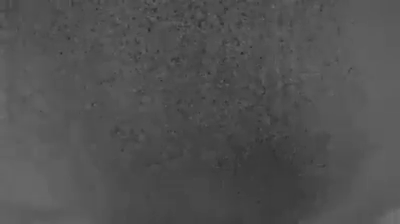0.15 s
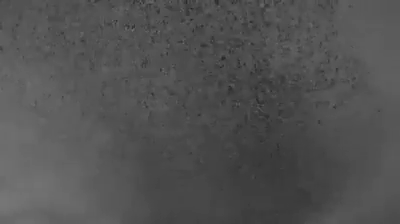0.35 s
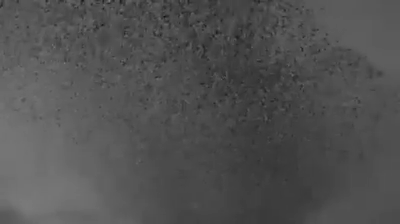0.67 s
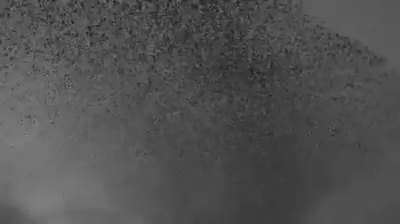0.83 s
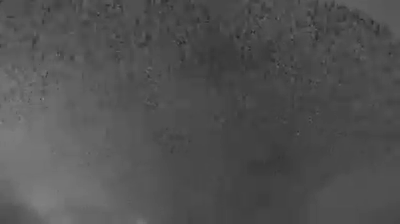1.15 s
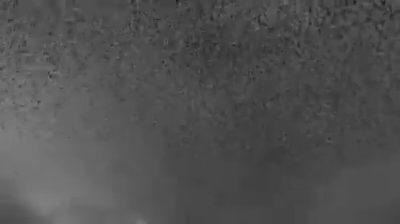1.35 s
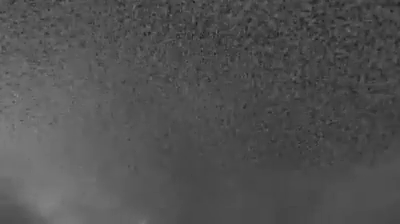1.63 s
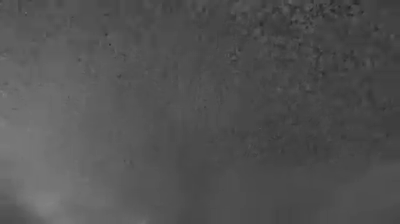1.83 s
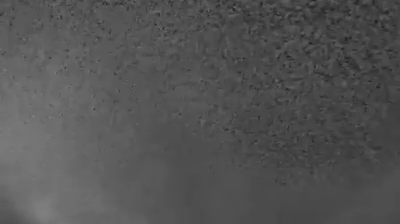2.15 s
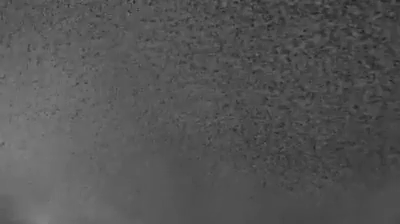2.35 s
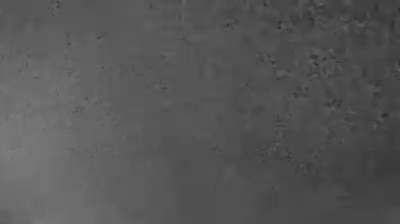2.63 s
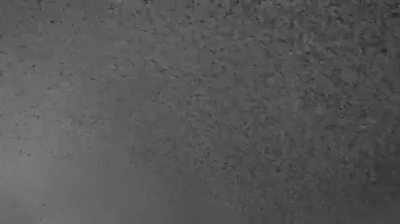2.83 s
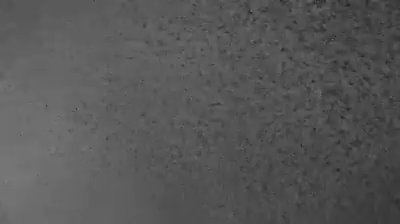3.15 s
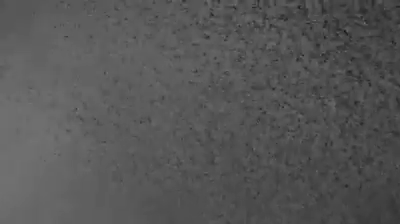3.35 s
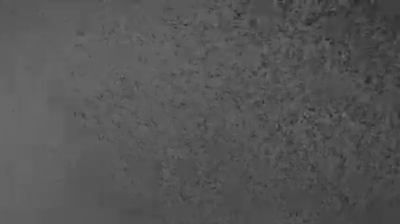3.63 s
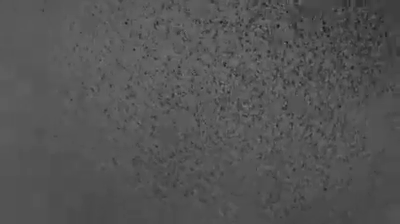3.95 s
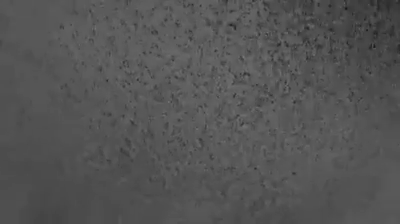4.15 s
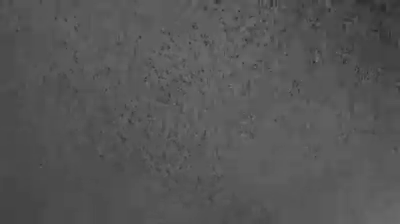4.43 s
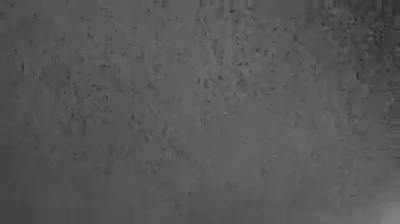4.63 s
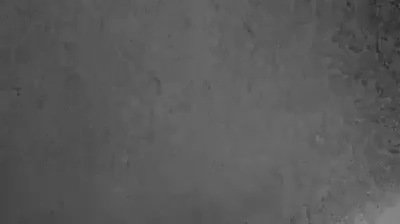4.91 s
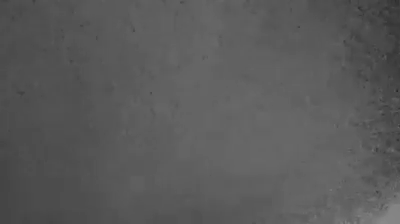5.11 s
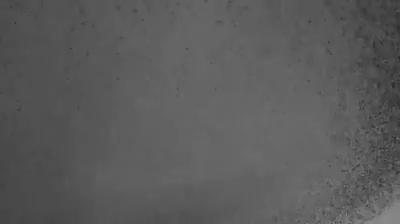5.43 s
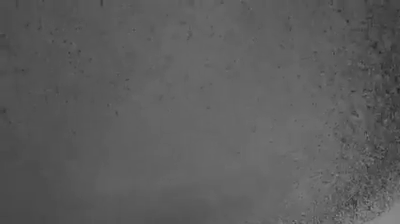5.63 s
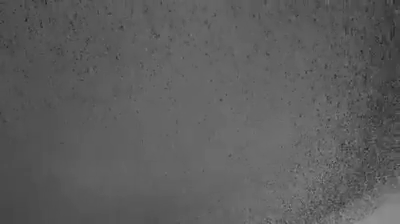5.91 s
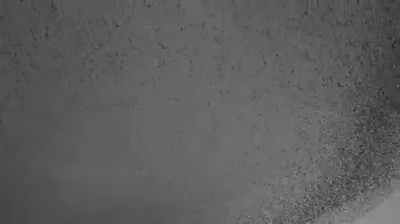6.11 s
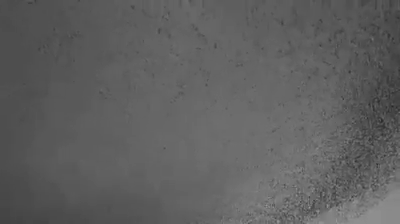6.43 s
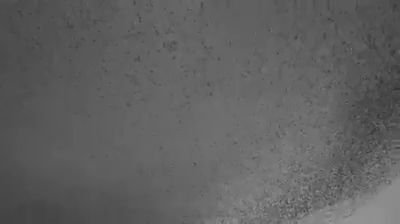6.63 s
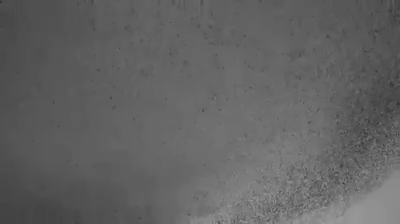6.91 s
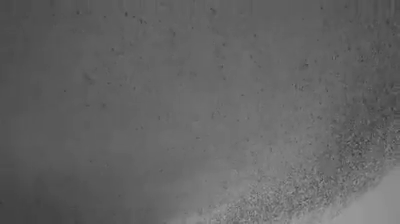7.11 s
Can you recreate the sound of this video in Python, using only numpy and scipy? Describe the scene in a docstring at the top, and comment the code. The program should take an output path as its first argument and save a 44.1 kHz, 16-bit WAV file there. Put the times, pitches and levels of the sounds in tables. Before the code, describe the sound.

From 0 seconds an enormous flock of small birds is already streaming past, close and low over open fields. Its wings merge into one loud, continuous rush: a mid-low thrum of pushed air, a broad feathery swish and a weak fine hiss, trembling with quick flutter and slight surges, with little deep bass. Short, raspy, buzzing chirps stand out from the start, a brighter pair around 0.5, others scattered through 1 to 3, and a clearer, lower whistle near 3.0. Behind them a faint, blurred chatter comes and goes. At about 4.1 a sharp, high call starts with a dry tick; more clipped calls cluster near 4.8, 5.6, 6.4 and 6.7, some ticking. From about 5 the rush weakens slightly as the flock draws off. A low, short chirp comes near 7.0, and the wings still rush at the end, around 7.3. Mono, with softened treble.

```python
"""A huge flock of small birds streams low over open fields, heard through one small microphone.
From the start the wings are one long rush of shaped noise: a thrum of pushed air, a swish and a fine hiss.
Short raspy chirps, made of gliding whistles, stick out of it over a far chatter that comes and goes.
After about four seconds a few sharp calls start abruptly, each with a short tick of noise.
Towards the end the flock draws off, and thrum, swish, hiss and chatter grow weaker."""
import sys
import numpy as np
from scipy import signal
from scipy.fft import rfft, irfft
from scipy.io import wavfile

SR = 44100
rng = np.random.default_rng(int(sys.argv[2]) if len(sys.argv) > 2 else 0)


def wav_record(signal):
    """Record a signal, one row per channel, as 16-bit PCM in the file named by sys.argv[1]."""
    frames = np.transpose(np.atleast_2d(signal))
    bounded = np.clip(frames, -1, 1)
    # unit amplitude maps onto the largest positive 16-bit level
    quanta = np.round(bounded * 32767).astype(np.int16)
    wavfile.write(sys.argv[1], SR, quanta)


N = 320166
T = np.arange(N) / SR   # time of every sample, s
HZ = np.maximum(np.arange(N // 2 + 1) * SR / N, 1)   # every frequency of the spectrum, Hz

# how strong the wings are as the flock streams overhead and draws off, before small changes:
# t/s, thrum of pushed air/dB, feather swish/dB
FLOCK_LEVELS = [(0, -17, -17.5), (0.2, -20, -18), (0.8, -20, -17.5), (1.1, -17.5, -17.5), (1.6, -20, -17.5),
                (1.95, -18, -17.5), (2.2, -19.5, -17.5), (3.6, -21, -18), (4.15, -20, -18),
                (4.6, -22.5, -18), (4.9, -20.5, -18.5), (5.45, -23, -19.0), (5.85, -21, -19.5),
                (6.5, -22.5, -19.5), (7.08, -23.5, -19.5), (7.26, -24, -19)]


def from_db(db):
    """Turn decibels into a gain."""
    return 10 ** (np.asarray(db) / 20)


def rms_one(x):
    """Scale to an average strength (rms) of 1."""
    return x / np.sqrt(np.mean(x ** 2) + 1e-20)


def in_time(rows):
    """Draw straight lines between the rows, giving each column a value at every sample."""
    s, *columns = np.transpose(rows)
    return [np.interp(T, s, column) for column in columns]


def below(edge_hz, order=4):
    """Gain at every frequency of a filter that keeps what is below the edge."""
    return 1 / np.sqrt(1 + (HZ / edge_hz) ** (2 * order))


def above(edge_hz, order=4):
    """Gain at every frequency of a filter that keeps what is above the edge."""
    return 1 / np.sqrt(1 + (edge_hz / HZ) ** (2 * order))


def coloured(x, gain):
    """Give each frequency its own gain, then scale to rms 1."""
    return rms_one(irfft(rfft(x) * gain, N))


def wobble(rate_hz):
    """A smooth random curve around 0 with spread 1; a higher rate makes it quicker."""
    return coloured(rng.standard_normal(N), below(rate_hz, order=2))


def wing_strokes(pass_s, sharpness, count=70):
    """Power from the nearest birds: each swells and fades as it passes, pulsing on every downstroke; mean 1."""
    wingbeats_per_s = 12   # each bird beats at 0.75 to 1.25 times this
    t = T[::40]   # slow curves need fewer points
    when, pace, phase, size = rng.random((count, 4)).T[:, :, None]
    # spread the passing birds evenly, with some chance
    when = (np.arange(count)[:, None] + when) / count * (T[-1] + 1) - .5
    beats = wingbeats_per_s * (.75 + .5 * pace) * t + phase
    downstroke = (np.sin(np.pi * beats) ** 2) ** abs(sharpness)
    nearness = 1 / (1 + ((t - when) / pass_s) ** 2) ** 2
    power = np.sum((.5 + size) * downstroke * nearness, axis=0)
    return np.interp(T, t, power / power.mean())


def turbulence(strokes, near_share):
    """Air torn by wings is noise: the near wings pulse, the far ones blend into an even noise."""
    share = np.clip(near_share, 0, 1)
    return rng.standard_normal(N) * np.sqrt(1 - share + share * strokes)


def fluttering(x, flutter_db=1.0, flutter_rate_hz=26, count=14):
    """Small knots of wings flutter in and out of step, each knot in its own band of the rush."""
    centres = np.linspace(np.log(300), np.log(3500), count)
    spectrum, out = rfft(x), np.zeros(N)
    for weights in np.eye(count):
        band_gain = np.interp(np.log(HZ), centres, weights)
        band = irfft(spectrum * band_gain, N)
        out += band * rms_one(from_db(flutter_db * wobble(flutter_rate_hz)))
    return irfft(rfft(out) * above(130), N)   # keep the quick flutter from spilling into the deep bass


def wings(thrum_edge_hz=900, hiss_edge_hz=7500, swish_db=0.5):
    """Wings push air on the downstroke, swish through the flight feathers and hiss at their tips."""
    # colour of the rush, before it is split into thrum, swish and hiss: f/Hz, level per Hz/dB
    rush_colour = [(120, -67), (160, -48), (200, -29), (250, -12.5), (330, -2), (510, 2), (780, -0.5),
                   (1020, -0.67), (1600, -4.5), (2700, -5.5), (3600, -10), (4600, -15), (5800, -17),
                   (7200, -21.5), (8500, -22.5), (11500, -34.5)]
    hz, db = np.transpose(rush_colour)
    colour = from_db(np.interp(np.log(HZ), np.log(hz), db)) * above(92)

    thrum_level, swish_level = in_time(FLOCK_LEVELS)
    # knots of birds beat together, so the thrum surges a little at random
    surge_db, surge_rate_hz = .4, 2.8
    thrum_level = thrum_level + surge_db * wobble(surge_rate_hz)
    # the air swallows the hiss, so it changes by several dB for each dB of swish
    hiss_db, hiss_db_per_swish_db = -35, 3   # the first is the level at the mean swish
    hiss_level = hiss_db + hiss_db_per_swish_db * (swish_level - swish_level.mean())

    pushes = wing_strokes(pass_s=0.23, sharpness=9.1)
    flicks = wing_strokes(pass_s=0.079, sharpness=6.6, count=130)
    swish_colour = colour * above(thrum_edge_hz) * below(hiss_edge_hz)
    thrum = coloured(turbulence(pushes, near_share=0.11), colour * below(thrum_edge_hz))
    swish = coloured(turbulence(flicks, near_share=0.054), swish_colour)
    rush = from_db(thrum_level) * thrum + from_db(swish_level + swish_db) * swish
    fluttered = fluttering(rush)
    hiss = coloured(turbulence(flicks, near_share=0.12), colour * above(hiss_edge_hz))
    return fluttered + from_db(hiss_level) * hiss


def rumble(level_db=-94):
    """A trace of low, steady noise."""
    return from_db(level_db) * wobble(130)


def chirps(rows, buzz_hz, buzz_depth, jitter_hz=800):
    """Each call is a gliding whistle, its pitch shaken into a rasp and its loudness chopped into a buzz."""
    attack_s, release_s = .006, .016   # a firm start and a softer end
    clear_rasp_hz = 110   # a call with a narrower rasp than this is a clear whistle and hardly buzzes
    out, buzz_drift = np.zeros(N), wobble(45)
    # the pitch swings between limits, so each call has a firm top edge
    shake = rms_one(np.tanh(2 * wobble(jitter_hz)))
    for s, length, start_hz, end_hz, rasp_hz, db in rows:
        at = np.arange(max(int(s * SR), 0), min(int((s + length) * SR), N))
        age = np.clip(T[at] - s, 0, length)
        buzz_rate = buzz_hz * (1 + 0.23 * buzz_drift[at])
        buzz = np.sin(2 * np.pi * np.cumsum(buzz_rate) / SR)
        pitch = start_hz + (end_hz - start_hz) * age / length + rasp_hz * shake[at]
        whistle = np.sin(2 * np.pi * np.cumsum(pitch) / SR)
        swell = np.sqrt(np.clip(np.minimum(age / attack_s, (length - age) / release_s), 0, 1))
        swell *= 1 + buzz_depth * buzz / (1 + (clear_rasp_hz / rasp_hz) ** 2)
        out[at] += np.sqrt(2) * from_db(db) * swell * whistle
    return irfft(rfft(out) * above(2100), N)   # keep the firm starts from spilling into the lows


def scattered(x, t60, wet_share, count=5):
    """The bodies of the flock throw back a short smear of echoes, which keeps changing as they fly."""
    t, share = T[:SR // 3], np.clip(wet_share, 0, 1)
    echoes = rng.standard_normal((count, len(t))) * from_db(-60 * t / t60)   # 60 dB weaker after t60 seconds
    paths = np.array([wobble(5.2) for _ in echoes])
    paths = paths / np.linalg.norm(paths, axis=0)   # the total power of the paths stays even
    wet = np.zeros(N)
    for path, echo in zip(paths, echoes):
        wet += signal.oaconvolve(x * path, echo / np.linalg.norm(echo))[:N]
    return np.sqrt(1 - share) * x + np.sqrt(share) * wet


def near_calls():
    """The nearer birds chirp in short raspy whistles, lightly smeared by echoes."""
    # one row for each call, its level before buzz, echoes and a small trim:
    # t/s, length/s, start pitch f/Hz, end pitch f/Hz, rasp width (rms) f/Hz, level/dB
    call_rows = [(.04, 0.038, 6600, 6400, 250, -27.5), (.105, .052, 6250, 5930, 520, -25),
                 (.48, .03, 4400, 4240, 250, -29), (.53, .048, 5770, 6100, 520, -20),
                 (.58, 0.063, 5900, 6020, 430, -24.5), (.98, .055, 6160, 6170, 280, -27),
                 (1.04, 0.038, 5730, 5400, 450, -25), (1.135, 0.038, 7200, 7900, 800, -29),
                 (1.22, 0.17, 8200, 7400, 900, -37), (1.255, 0.054, 5200, 5000, 650, -30),
                 (1.38, 0.11, 6430, 5580, 600, -28), (1.88, 0.085, 5600, 6160, 600, -30),
                 (2.0, 0.038, 4700, 4600, 220, -21), (2.345, .026, 5630, 5600, 350, -24),
                 (2.61, .04, 6400, 6200, 500, -30), (2.69, 0.074, 4900, 5300, 650, -32),
                 (2.77, .12, 5950, 7030, 650, -30), (3.035, .125, 3450, 3430, 25, -26.5),
                 (3.09, 0.088, 4770, 5500, 880, -30), (3.275, .045, 5620, 5670, 400, -28),
                 (3.51, .06, 5200, 4900, 594, -36), (3.78, 0.044, 4700, 4700, 646, -28),
                 (4.055, 0.045, 6500, 6840, 500, -30), (4.115, 0.048, 5500, 4880, 800, -25),
                 (4.144, .018, 8100, 8250, 500, -21), (4.168, .012, 7700, 8100, 500, -31),
                 (4.17, .04, 4000, 3300, 100, -28), (4.76, .05, 4550, 4660, 700, -29),
                 (4.79, 0.054, 6150, 6200, 480, -22.5), (4.834, 0.025, 6500, 6050, 520, -22),
                 (4.845, 0.041, 6000, 5000, 650, -27), (5.348, .026, 8100, 7700, 450, -32),
                 (5.42, 0.046, 6800, 6250, 600, -29), (5.425, .045, 4800, 4400, 550, -27.5),
                 (5.565, 0.055, 6050, 5900, 380, -27), (5.607, .025, 8000, 7700, 700, -35),
                 (5.625, .05, 5970, 5680, 600, -30), (5.605, 0.029, 4500, 4350, 260, -23),
                 (5.634, .026, 4690, 4500, 300, -22.5), (5.83, .04, 7450, 6900, 650, -34),
                 (5.9, 0.06, 5840, 5770, 500, -28.5), (6.12, 0.11, 5360, 4200, 550, -30),
                 (6.265, .035, 4700, 4470, 400, -29), (6.35, 0.021, 5400, 5900, 450, -26),
                 (6.402, 0.059, 6100, 5900, 705, -25), (6.397, 0.02, 4380, 4270, 200, -21),
                 (6.615, 0.034, 4400, 5870, 850, -24.5), (6.648, 0.018, 7650, 7750, 650, -21),
                 (6.668, .014, 7600, 7400, 650, -31), (6.718, .026, 8100, 7950, 250, -34),
                 (6.745, 0.027, 6870, 6700, 600, -25), (6.95, 0.059, 5970, 6100, 990, -33),
                 (7.04, 0.061, 2780, 2460, 150, -21.5), (7.162, 0.036, 4470, 4260, 230, -22),
                 (7.175, 0.035, 6200, 7300, 1000, -30)]
    calls = chirps(call_rows, buzz_hz=187.5, buzz_depth=0.64)
    return from_db(-1.0) * scattered(calls, t60=0.14, wet_share=0.35)


def chatter(low_hz=4200, high_hz=6700, rasp_hz=550, under_swish_db=-20.5, count=1100):
    """Many calls from deep in the flock, blurred by distance; they come in bouts and fade with the wings."""
    # lulls in which the far birds grow quiet: t at the middle/s, half length/s
    lull_times = [(.36, .1), (0.882, 0.11), (2.21, 0.032), (2.54, 0.1), (2.93, 0.061), (3.367, 0.032),
                  (3.66, 0.085), (4.683, 0.022), (4.97, .07), (5.11, 0.09), (5.293, 0.061), (5.754, 0.045),
                  (6.065, 0.043), (6.533, 0.023), (6.87, 0.041)]
    lull_db = -10   # at the middle of a lull
    when, length, pitch, glide, depth = rng.random((count, 5)).T
    _, swish_level = in_time(FLOCK_LEVELS)
    start_hz = low_hz * (high_hz / low_hz) ** pitch
    end_hz = start_hz * (1.05 - .12 * glide)
    length_s = 0.0295 + 0.0655 * length
    # far and high calls arrive weaker
    call_db = under_swish_db - 20 * np.log10((.5 + depth) * start_hz / low_hz)
    rasps = np.full(count, rasp_hz)
    rows = np.column_stack([when * T[-1], length_s, start_hz, end_hz, rasps, call_db])
    lulls = [np.exp(-np.square(((T - s) / half) ** 2)) for s, half in lull_times]
    hush = np.max(lulls, axis=0)
    calls = chirps(rows, buzz_hz=181.0, buzz_depth=0.76)
    return from_db(swish_level + lull_db * hush) * scattered(calls, t60=0.091, wet_share=0.65)


def call_ticks(t60=0.011):
    """A sharp "tsik" call starts with a dry, bright tick: noise that starts at once and dies in milliseconds."""
    # sharp calls, with the strength of the noise at the onset, before the filter: t/s, level/dB
    onsets = [(4.143, -8), (5.612, -16), (6.648, -13), (6.746, -16)]
    burst = sum(from_db(db - 60 * np.abs(T - s) / t60) * (T >= s) for s, db in onsets)
    bright = signal.butter(6, [1200, 8300], "band", fs=SR, output="sos")
    return signal.sosfilt(bright, burst * rng.standard_normal(N))


def scene():
    """Wings, a trace of low rumble, calls, chatter and ticks of sharp calls, the same in both channels."""
    mix = wings() + rumble() + near_calls() + chatter() + call_ticks()
    return np.tile(mix, (2, 1))


def record(dry):
    """The microphone's housing ripples the treble, the highest peaks are rounded, the top is cut steeply."""
    # ripples of the housing: f/Hz, width f/Hz, level/dB
    housing_ripples = [(4170, 690, 2.5), (4350, 100, 2)]
    ripple_db = sum(db / (1 + (2 * (HZ - hz) / width) ** 2) for hz, width, db in housing_ripples)
    heard = irfft(rfft(dry) * from_db(ripple_db), N)
    heard = heard / (1 + (heard / .92) ** 16) ** (1 / 16)   # no peak gets past 0.92
    cutoff_hz = 11600
    steep_cut = signal.ellip(12, .1, 90, cutoff_hz, fs=SR, output="sos")
    return signal.sosfilt(steep_cut, heard)


dry = scene()
out = record(dry)
wav_record(out)
```